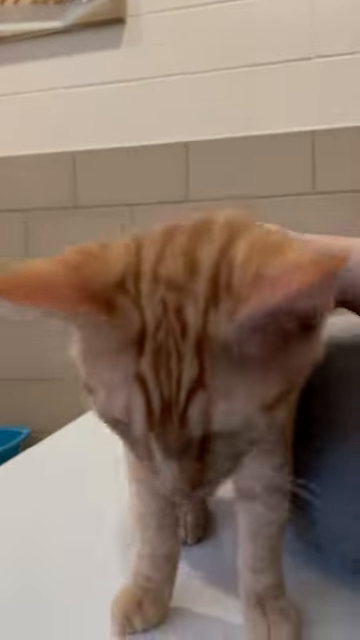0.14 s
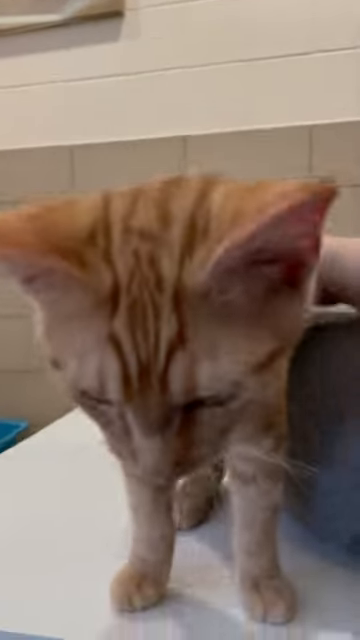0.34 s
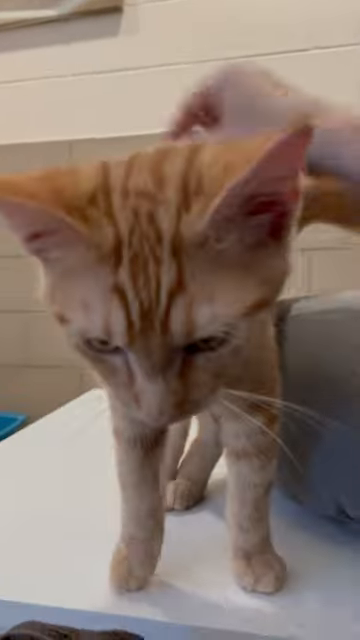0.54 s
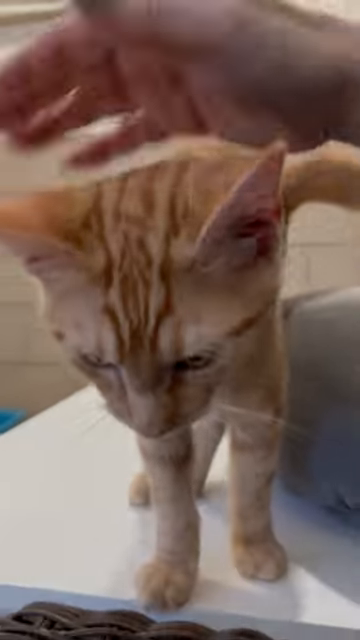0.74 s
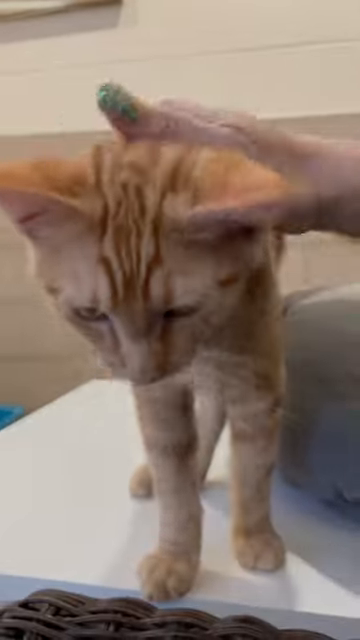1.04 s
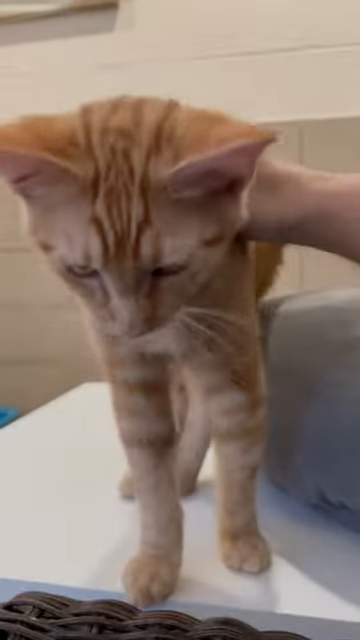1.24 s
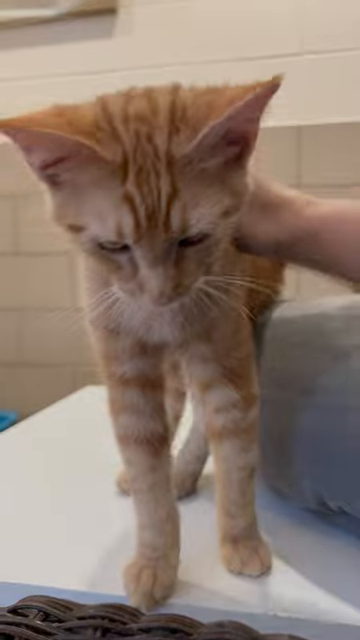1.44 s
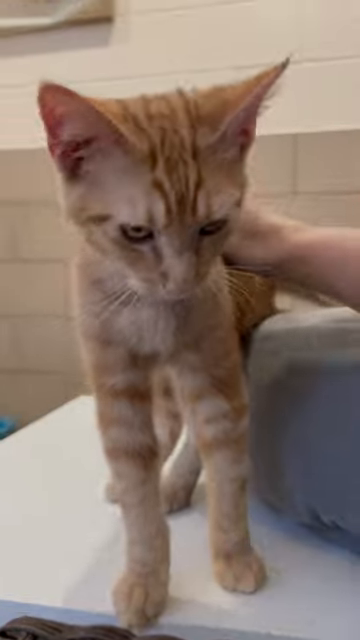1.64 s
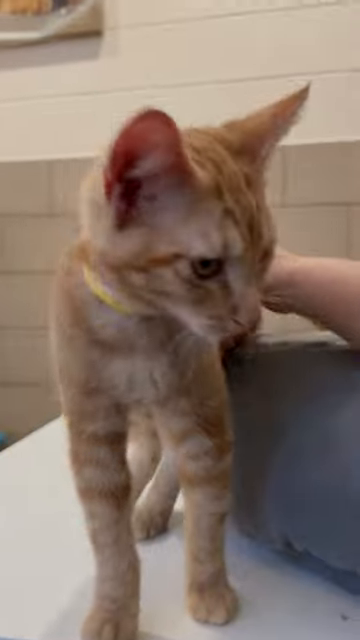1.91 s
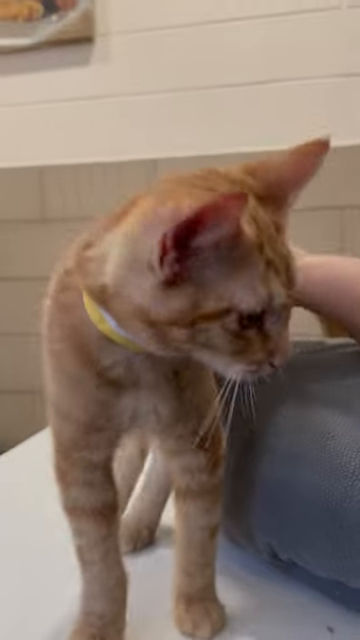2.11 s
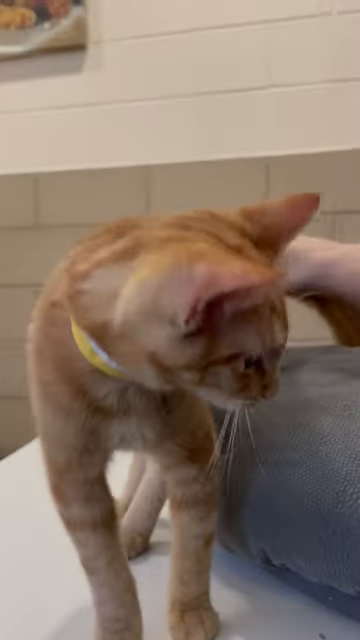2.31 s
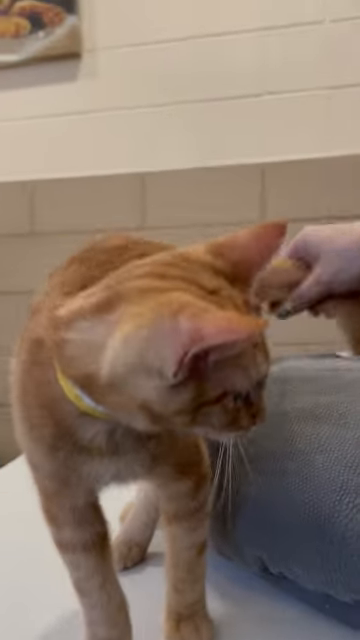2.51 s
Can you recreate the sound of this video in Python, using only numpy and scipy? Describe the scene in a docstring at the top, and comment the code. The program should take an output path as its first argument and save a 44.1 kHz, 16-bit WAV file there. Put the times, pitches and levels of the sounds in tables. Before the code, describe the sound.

Soft swishes of a hand stroking a kitten's fur over a low, steady room rumble

```python
"""In a room with a low drone, probably from ventilation, a hand strokes a kitten close to the microphone.
The drone is three wavering sines; dull rumble and a little air noise are filtered noise around it.
Each stroke shapes rubbing noise into a soft swish of palm on coat and a fizz of single hairs.
Firm presses add a muffled rub, small contacts give damped ticks, and the last long rub is a hiss
that narrows while its pitch mostly sinks."""
import sys
import numpy as np
from scipy import signal
from scipy.fft import rfft, irfft, next_fast_len
from scipy.io import wavfile
from scipy.ndimage import uniform_filter1d, map_coordinates

SR = 44100
rng = np.random.default_rng(int(sys.argv[2]) if len(sys.argv) > 2 else 0)


def unload_wav(signal):
    """Save mono or channel-first audio to the path in sys.argv[1] as 16-bit WAV at rate SR, clipped to [-1, 1]."""
    wavfile.write(
        sys.argv[1],
        SR,
        np.round(np.clip(np.atleast_2d(signal).T, -1, 1) * 32767).astype(np.int16),
    )


N = 117306  # samples

# Drone notes: pitch_hz, pitch_waver_hz, late_rise_hz, flutter_db, gain_db
DRONE = [(63.6, 1.33, 0, 1, -1), (90.26, 1.5, 0, 1, 0), (119.4, 2.62, 7, 2, -0.5)]
# Levels of the drone notes before gain and flutter: time_s, level_db
LOW_NOTE = [(0.0, -40.5), (0.08, -56), (0.18, -42), (0.32, -39.5), (0.41, -45.5), (0.52, -40), (0.66, -46),
            (0.73, -35), (0.97, -52.5), (1.25, -43.5), (1.34, -38), (1.41, -51.5), (1.7, -47), (1.75, -63),
            (1.94, -37.5), (2.04, -53.5), (2.08, -38.5), (2.15, -40.5), (2.19, -53.5), (2.44, -37),
            (2.51, -52), (2.66, -46)]
MID_NOTE = [(0.0, -49.5), (0.09, -67), (0.28, -41.5), (0.44, -52), (0.55, -40.5), (0.7, -52), (1.15, -45.5),
            (1.18, -41), (1.51, -47.5), (1.55, -43.5), (2.33, -41.5), (2.38, -58), (2.44, -42),
            (2.6, -52.5), (2.63, -37), (2.66, -56)]
HIGH_NOTE = [(0.0, -62.5), (0.07, -48.5), (0.84, -47.5), (0.87, -64.5), (0.98, -41), (1.01, -56.5),
             (1.16, -42), (1.18, -48.5), (2.0, -47), (2.17, -37.5), (2.23, -46), (2.36, -35.5),
             (2.4, -50.5), (2.44, -37), (2.61, -45.5), (2.66, -54)]
# Span in which the top note creeps up: start_s, end_s
DRONE_RISE_S = (1.95, 2.4)
# Spectrum shape of the rumble: frequency_hz, relative_level_db
RUMBLE_SPECTRUM = [(18, -28.5), (29, -0.5), (40, -5.5), (60, 5), (100, 4), (110, 2.5), (145, -2), (172, 2),
                   (208, 1), (225, -8), (245, -2), (278, -10), (294, -2.5), (318, -13.5), (360, -12),
                   (460, -22), (700, -31.5), (1500, -68.5)]
# Slow swell of the rumble: time_s, gain_db
RUMBLE_SWELL = [(0, -2.5), (.25, -0.5), (.9, 0), (1.55, -1), (2.0, 0), (2.4, 0.5), (2.66, -1.5)]
RUMBLE_DB = -47  # rms before the swell
# Spectrum shape of the air noise: frequency_hz, relative_level_db
AIR_SPECTRUM = [(100, -13), (350, 4), (600, 2.5), (800, -1.5), (1000, -0.5), (1400, -8), (1800, -14.5),
                (2500, -15), (3500, -25), (5500, -29.5), (10000, -36.5), (16000, -35.5)]
# Level of the air noise: time_s, level_db
AIR_LEVEL = [(0, -64), (.6, -64.5), (1.3, -65), (2.1, -65), (2.4, -63), (2.66, -64.5)]
# Left-right likeness of the air noise: frequency_hz, correlation (no unit)
AIR_ALIKE = [(200, 0.49), (500, 0.12), (900, 0.31), (1900, 0.78), (3000, 0.45), (4600, 0.4), (6000, 1),
             (8000, 0.98), (14000, 0.71)]

# Strokes: fullest_s, rise_s, fall_s, swish_db, fizz_db, swish_colour_hz, colour_lift_db, colour_width_octaves
STROKES = [(0.02, .1, 0.22, -70.5, -80, 4640, 5, 0.55), (0.19, 0.13, 0.1, -74, -99, 4640, 9, 0.12),
           (0.386, 0.053, 0.12, -86.5, -79, 5600, 5, .17), (0.56, 0.16, .25, -79.5, -108.5, 2710, 6, 0.19),
           (0.86, 0.042, 0.13, -80, -78.5, 5380, 8, .17), (0.971, .055, 0.14, -75.5, -76, 5400, 5, 0.27),
           (1.14, 0.077, 0.072, -68, -74, 4500, 10, .8), (1.27, 0.13, 0.21, -76.5, -82.5, 2560, 3, .1),
           (1.386, 0.05, 0.052, -70.5, -69, 5260, 5.5, 0.36),
           (1.45, 0.061, 0.068, -77, -78.5, 5700, 8.5, 0.22),
           (1.885, 0.076, 0.06, -82.5, -100, 2420, 12, .18), (1.97, .05, .08, -82, -100, 2520, 12.5, 0.21),
           (2.159, 0.21, 0.42, -83, -79.5, 2420, 13, 0.26),
           (2.375, 0.11, 0.14, -74.5, -77.5, 5200, -0.5, 0.34),
           (2.54, 0.11, 0.17, -76, -78, 5360, -2.5, .3)]
# Spectrum shape of palm on coat: frequency_hz, relative_level_db
SWISH = [(700, -19.5), (1500, -2), (2500, 2.5), (4000, -2), (5500, -3.5), (7000, -7), (10000, -18.5),
         (16000, -28.5)]
# Spectrum shape of the hair tips: frequency_hz, relative_level_db
FIZZ = [(3000, -41), (5500, -6.5), (7000, -2), (8500, 1), (10000, 2), (12000, -1), (14000, -5.5),
        (15300, -3.5)]
# Left-right likeness of the fur noise: frequency_hz, correlation (no unit)
FUR_ALIKE = [(1000, .4), (2000, .8), (2900, 0.5), (4200, 0.29), (5500, .85), (7700, 1), (9500, 0.77),
             (11000, 1), (14500, 0.81)]
HAIRS_PER_S, HAIR_POWER_SHARE = 2500, 0.32  # hairs slipping free, their share of the rubbing power
STROKE_EDGE = 2.83  # exponent: steepness of a stroke's rise and fall
RIPPLE_DB, RIPPLE_HZ = 2.5, 69.6  # fine random colouring of each stroke, and its knot spacing
JUDDER_DB, JUDDER_PER_S = 0.97, 59  # the hand drags unevenly

# Firm presses: fullest_s, half_length_s, level_db
PRESSES = [(0.048, .14, -68), (2.4, .17, -64)]
PRESS_HZ, PRESS_SHARPNESS = 455, 1.6  # the body's broad resonance

# Small contact ticks: start_s, level_db (before halving and decay), pitch_hz, t60_s, scrape_over_ring (ratio)
TICKS = [(0.338, -58, 1920, .035, .5), (0.346, -56, 1050, .05, .5), (0.365, -73.5, 5970, 0.021, 2),
         (0.371, -60, 2050, .03, .4), (0.406, -60.5, 1310, 0.032, .6), (0.454, -57, 1830, 0.027, .5),
         (0.464, -62.5, 1900, .035, .6), (0.488, -55, 1930, 0.032, 0.58), (0.9697, -66.5, 10500, .015, 2),
         (1.018, -60, 1800, .02, 0.87), (1.079, -56, 1900, .025, 1.1), (1.402, -60.5, 2700, 0.013, 1.5),
         (2.418, -69, 5100, 0.043, .7), (2.436, -65, 4180, 0.046, 0.54), (2.452, -61.5, 4780, 0.038, 0.52)]
TICK_ATTACK_S = 0.001
TICK_ROUGH_RAD, TICK_ROUGH_PER_S = 0.5, 640  # phase jitter of the ring

# The last long rub along the back: time_s, level_db, pitch_hz
RUB = [(1.75, -105, 3800), (1.87, -91.5, 3750), (2.05, -86.5, 3620), (2.22, -78.5, 3397), (2.37, -78, 3368),
       (2.5, -79.5, 3364), (2.58, -82.5, 3380), (2.64, -76.5, 3320)]
RUB_WIDTH_HZ = 380  # half width at first
RUB_NARROWING = 0.3  # share of that width left at the end
RUB_ALIKE = 0.35  # left-right correlation

# Phase by which the left microphone port leads the right: frequency_hz, lead_rad
PORT_PHASE = [(500, 0), (1500, -0.48), (2600, 0.95), (3500, 0.73), (4400, 0.86), (5100, -0.5), (6200, 1.72),
              (7700, 3), (9300, 5), (10600, 6.5), (11600, 6.5), (13000, 8.2), (13700, 10), (14600, 9.5),
              (15700, 12)]
TOP_HZ = 15750  # band limit


def amp(db):
    """Logarithmic level: decibels to amplitude gain."""
    return 10 ** (np.asarray(db) / 20)


def unit(x):
    """Normalisation: scale to rms 1."""
    return x / np.sqrt(np.mean(x ** 2) + 1e-20)


def along(points, hz):
    """Logarithmic frequency scale: interpolate (Hz, value) points."""
    f, v = np.transpose(points)
    return np.interp(np.log(hz + 1), np.log(f + 1), v)


def curve(rows):
    """Linear interpolation: (s, value) points as one value per sample."""
    return np.interp(np.arange(N) / SR, *np.transpose(rows))


def wobble(rate):
    """Band-limited fluctuation: a smooth random curve with rate knots a second."""
    knots = rng.standard_normal(1024)
    return map_coordinates(knots, [np.arange(N) * rate / SR + 2], mode="mirror")


def filtered(x, response):
    """Linear filtering: multiply the spectrum by a response of frequency."""
    m = next_fast_len(N + SR // 10)  # padded against wrap-around
    return irfft(rfft(x, m) * response(np.fft.rfftfreq(m, 1 / SR)), m)[..., :N]


def stereo(pair, colour, alike):
    """Partial coherence: two unrelated signals mix as mid and side into coloured stereo of rms 1."""
    def response(hz):
        """Power split by angle: the cosine of twice the angle is the left-right correlation."""
        turn = np.arccos(np.clip(along(alike, hz), -1, 1)) / 2
        return amp(colour(hz)) * np.array([np.cos(turn), np.sin(turn)])

    mid, side = filtered(pair, response)
    return unit(np.array([mid + side, mid - side]))


def drone():
    """Frequency modulation: three low sines waver in pitch and level, the same in both channels."""
    out = np.zeros(N)
    for note, level in zip(DRONE, (LOW_NOTE, MID_NOTE, HIGH_NOTE)):
        hz, waver_hz, rise_hz, flutter_db, gain_db = note
        level_db = uniform_filter1d(curve(level), size=1500)
        rise = rise_hz * curve(np.c_[DRONE_RISE_S, (0, 1)])
        pitch = hz + waver_hz * wobble(14) + rise
        phase = 2 * np.pi * (np.cumsum(pitch) / SR + rng.random())
        loudness = amp(level_db + gain_db + flutter_db * wobble(16))
        out += loudness * np.sqrt(2) * np.sin(phase)  # root two makes the levels rms
    return out


def room():
    """Broadband noise: a dull central rumble and a wider wash of moving air."""
    rumble = unit(filtered(rng.standard_normal(N), lambda hz: amp(along(RUMBLE_SPECTRUM, hz))))
    air = stereo(rng.standard_normal((2, N)), lambda hz: along(AIR_SPECTRUM, hz), AIR_ALIKE)
    return amp(RUMBLE_DB + curve(RUMBLE_SWELL)) * rumble + amp(curve(AIR_LEVEL)) * air


def friction():
    """Sliding friction: smooth rubbing noise plus the tiny snaps of hairs slipping free."""
    slips = rng.random(N) < HAIRS_PER_S / SR
    snaps = unit(slips * rng.standard_normal((2, N)))
    smooth = rng.standard_normal((2, N))
    return np.sqrt(HAIR_POWER_SHARE) * snaps + np.sqrt(1 - HAIR_POWER_SHARE) * smooth


def strokes():
    """Friction under a moving hand: each stroke swells and fades as palm swish and hair-tip fizz."""
    t, out = np.arange(N) / SR, np.zeros((2, N))
    for s, rise, fall, swish_db, fizz_db, colour_hz, lift_db, octaves in STROKES:
        distance = np.abs(t - s) / np.where(t < s, rise, fall)
        envelope = np.exp(-2 * distance ** STROKE_EDGE)
        knots = rng.standard_normal(size=1000)
        ripple = lambda hz: RIPPLE_DB * np.interp(hz / RIPPLE_HZ, np.arange(len(knots)), knots)
        lift = lambda hz: lift_db * np.exp(-(np.log2((hz + 1) / colour_hz) / octaves) ** 2)
        swish = stereo(friction(), lambda hz: along(SWISH, hz) + lift(hz) + ripple(hz), FUR_ALIKE)
        fizz = stereo(friction(), lambda hz: along(FIZZ, hz) + ripple(hz), FUR_ALIKE)
        out += envelope * (amp(swish_db) * swish + amp(fizz_db) * fizz)
    return out * amp(JUDDER_DB * wobble(JUDDER_PER_S))


def presses():
    """Broad resonance: a muffled rub swells through the kitten's body where the hand bears down."""
    t = np.arange(N) / SR
    weight = sum(amp(db) * np.exp(-((t - s) / half) ** 2) for s, half, db in PRESSES)

    def body(hz):
        """Resonance curve: the level falls in dB with detuning to either side."""
        detuning = (hz + 1) / PRESS_HZ - PRESS_HZ / (hz + 1)
        return -20 * np.log10(1 + (PRESS_SHARPNESS * detuning) ** 2 / 2)

    return weight * stereo(friction(), body, FUR_ALIKE)


def ticks():
    """Damped vibration: each tiny contact is a short, rough ring with a scrape around it."""
    out, t = np.zeros((2, N)), np.arange(SR // 10) / SR
    for s, db, hz, t60, scratchy in TICKS:
        shape = amp(-60 * t / t60) * (1 - np.exp(-t / TICK_ATTACK_S))
        band = signal.butter(2, [hz / np.sqrt(2), hz * np.sqrt(2)], "bandpass", fs=SR)
        scrape = unit(signal.lfilter(*band, rng.standard_normal((2, len(t)))))
        jitter = TICK_ROUGH_RAD * wobble(TICK_ROUGH_PER_S)[:len(t)]
        ring = np.sin(2 * np.pi * hz * t + jitter)
        out[:, round(s * SR):][:, :len(t)] += amp(db) * shape * (ring + scratchy * scrape) / 2
    return out


def rub():
    """Moving resonance: skin on coat as a band of noise that mostly sinks, and narrows as it goes on."""
    s, level_db, hz = np.transpose(RUB)
    carrier = np.exp(2j * np.pi * np.cumsum(curve(np.c_[s, hz])) / SR)

    def hiss(width_hz):
        """Quadrature modulation: low-passed noise shifted to a band around the moving pitch."""
        skirt = lambda f: -10 * np.log10(1 + (f / width_hz) ** 4)
        a, b = (stereo(rng.standard_normal((2, N)), skirt, [(1, RUB_ALIKE)]) for _ in range(2))
        return a * carrier.real + b * carrier.imag

    # an equal-power crossfade from wide to narrow
    progress = curve([(s[0], 0), (s[-1], 1)])
    wide = np.sqrt(1 - progress) * hiss(RUB_WIDTH_HZ)
    narrow = np.sqrt(progress) * hiss(RUB_WIDTH_HZ * RUB_NARROWING)
    return amp(curve(np.c_[s, level_db])) * (wide + narrow)


def scene():
    """Superposition: the room with the stroking in front of it."""
    return drone() + room() + strokes() + presses() + ticks() + rub()


def record(dry):
    """Interchannel phase: the microphone ports drift apart through the treble, below a sharp band limit."""
    half_lead = np.array([[0.5], [-0.5]])  # left ahead, right behind
    ports = lambda hz: np.exp(1j * half_lead * along(PORT_PHASE, hz))
    return filtered(dry, lambda hz: ports(hz) * (hz < TOP_HZ))


dry = scene()
out = record(dry)
unload_wav(out)
```